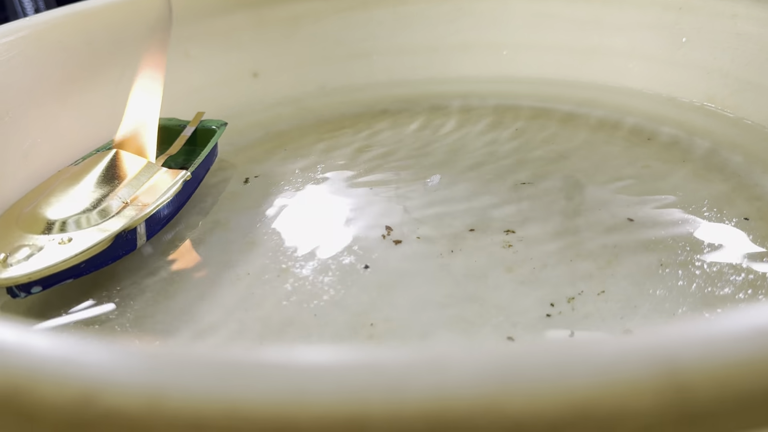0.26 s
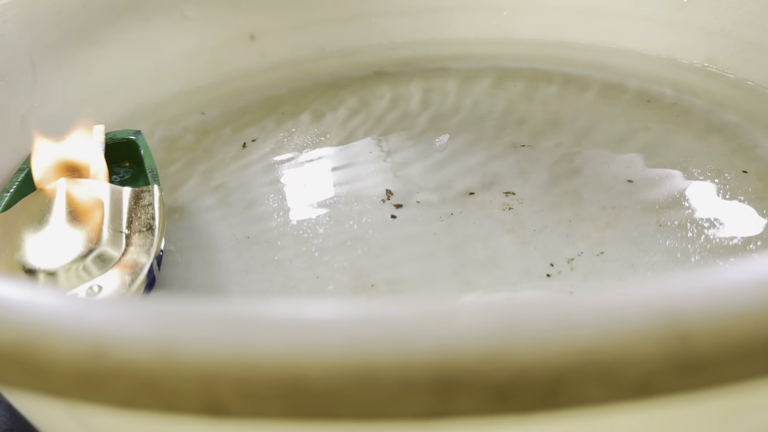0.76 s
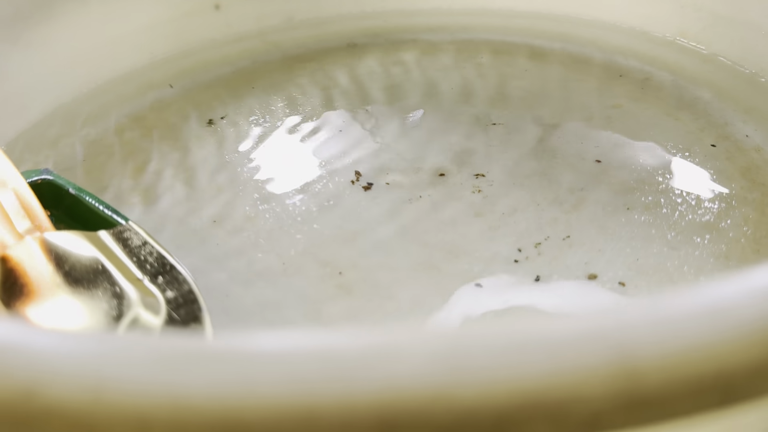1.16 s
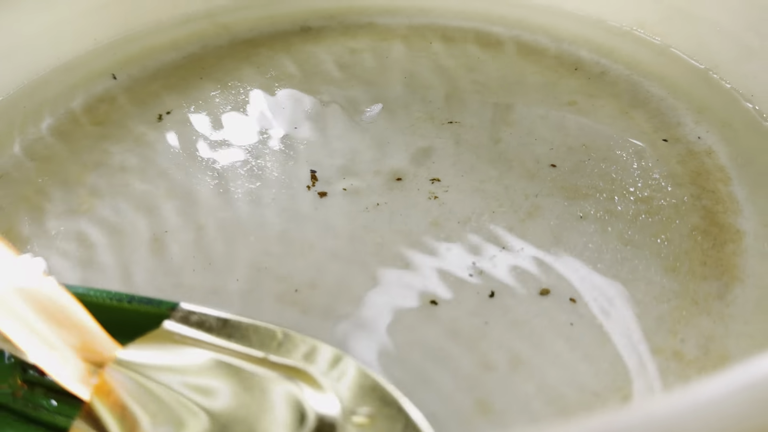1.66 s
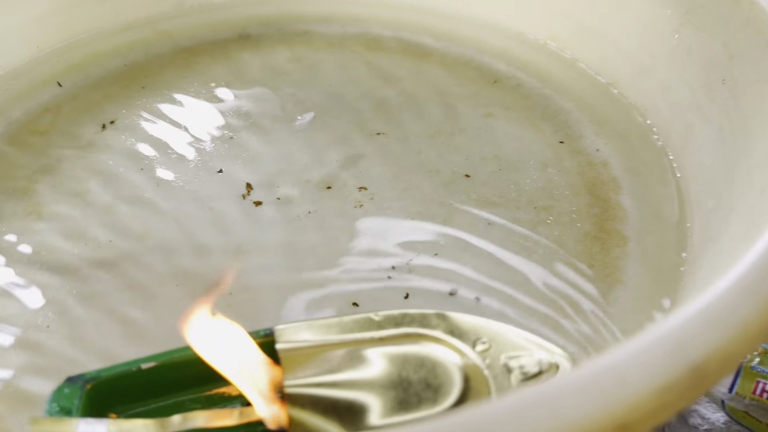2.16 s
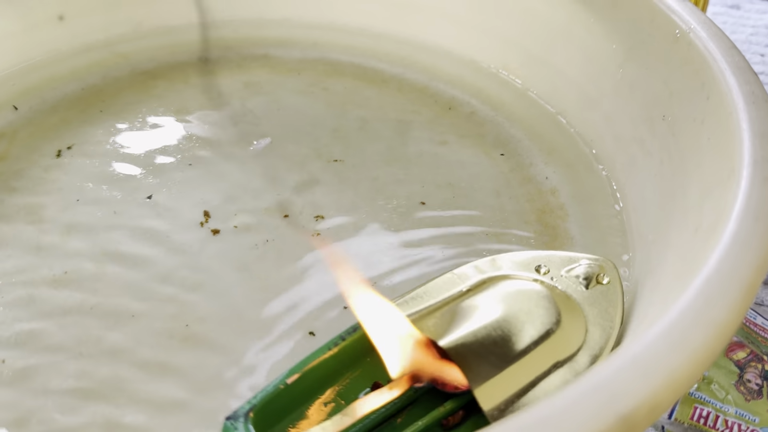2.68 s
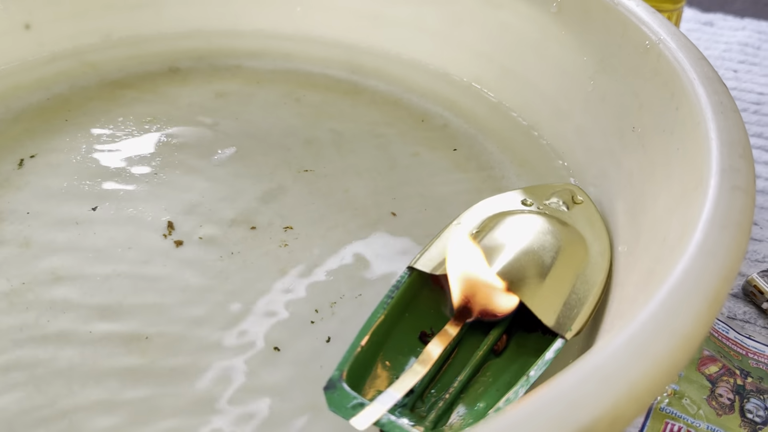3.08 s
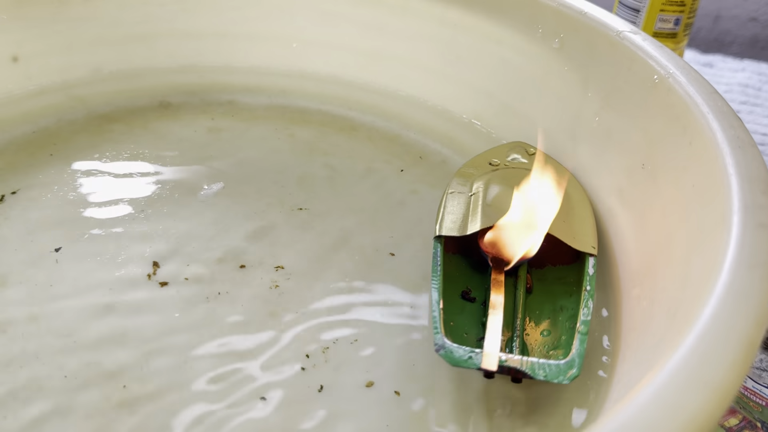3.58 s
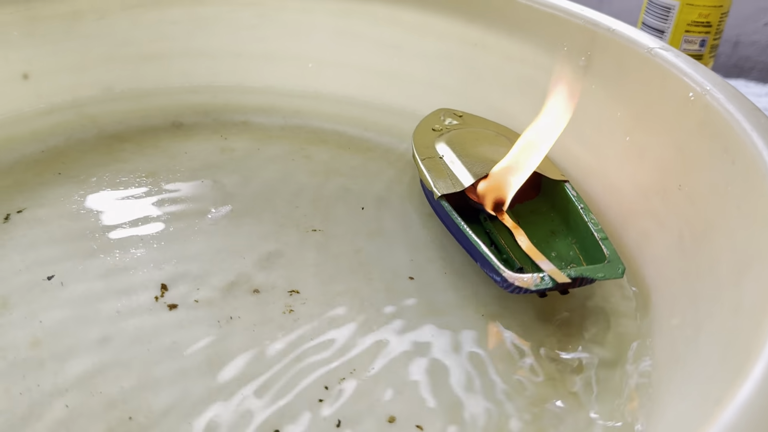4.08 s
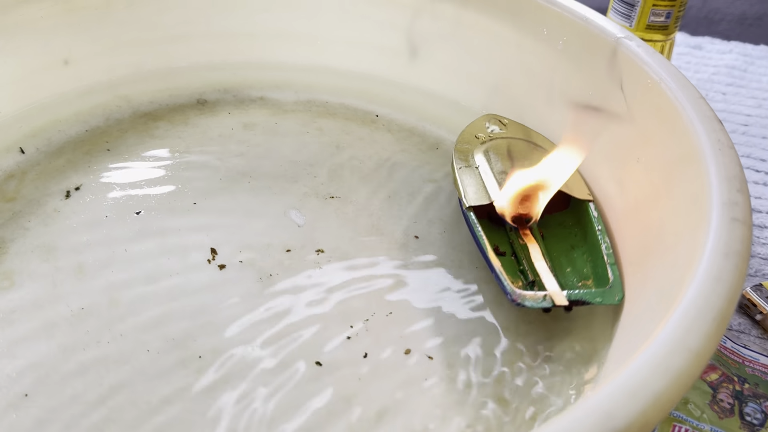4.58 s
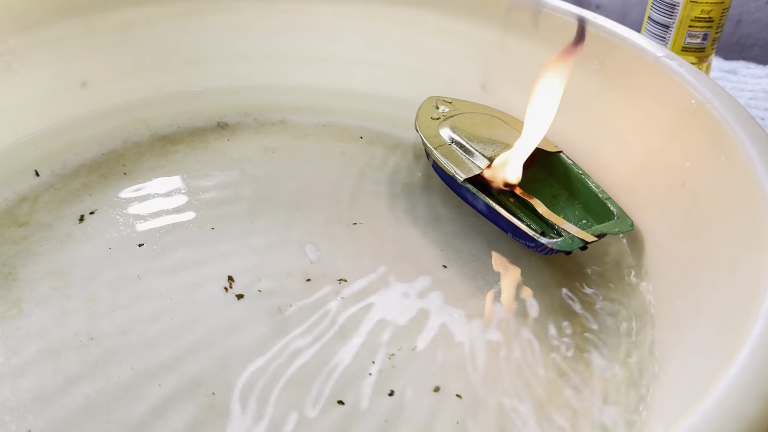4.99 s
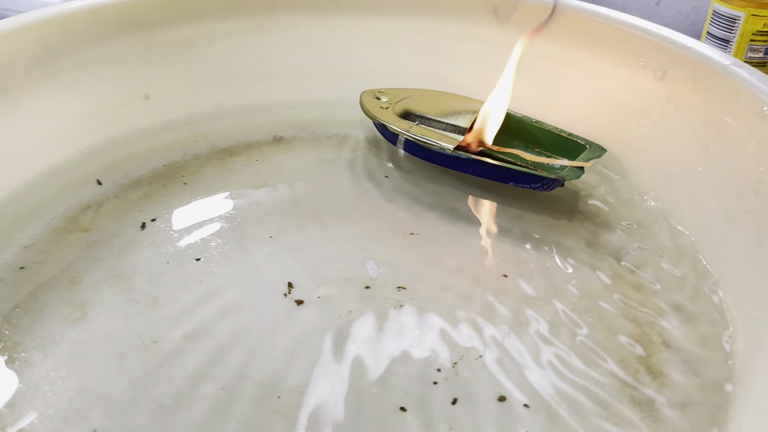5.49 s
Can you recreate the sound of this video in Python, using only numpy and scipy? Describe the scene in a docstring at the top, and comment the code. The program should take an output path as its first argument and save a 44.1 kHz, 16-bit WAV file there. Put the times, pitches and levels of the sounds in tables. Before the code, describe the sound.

A tiny tin toy steam boat putters rapidly in a water basin, its metallic popping growing louder, with one brief hiccup near the end.

```python
"""Tin steam boat in a basin

A candle-heated tin toy boat circles a plastic basin of water. Its boiler diaphragm snaps out and back in
about eighteen times a second: each snap is a damped sine pop that rings split hull modes, sets off noise
rattle and echoes round the basin wall. Near 4.35 s two inward snaps follow closely. A pair of microphone
ports hangs just over the rim; soft knocks, a room tail and faint rumble lie behind."""
import sys
import numpy as np
from scipy import signal
from scipy.fft import rfft, irfft
from scipy.io import wavfile

SR = 44100
rng = np.random.default_rng(int(sys.argv[2]) if len(sys.argv) > 2 else 0)


def bounce(signal):
    """Save signal as a 16-bit WAV file at the path given by the first command-line argument."""
    frames = np.transpose(np.atleast_2d(signal))
    limited = np.clip(frames, -1, 1)
    pcm = np.round(limited * 32767).astype(np.int16)
    wavfile.write(sys.argv[1], SR, pcm)


N = 253134
LENGTH = 4096  # samples computed for each snap or knock
AGE_S = np.arange(LENGTH) / SR

# Diaphragm snaps outward. Each row: time in seconds, level in dB.
OUT_SNAPS = [(0.0366, -24), (0.0919, -21.5), (0.147, -21), (0.2017, -21), (0.2565, -23.5), (0.3127, -23.5),
             (0.3679, -22), (0.4228, -22), (0.4778, -22), (0.533, -21.5), (0.5883, -22.5), (0.6444, -19.5),
             (0.6996, -23), (0.7546, -20), (0.8101, -20.5), (0.8653, -20.5), (0.9213, -19), (0.9776, -19),
             (1.0325, -19), (1.088, -16.5), (1.1428, -17.5), (1.1986, -18.5), (1.2543, -18),
             (1.3096, -16.5), (1.3648, -18), (1.4202, -17), (1.4761, -14.5), (1.5317, -15), (1.5869, -15.5),
             (1.6419, -15), (1.6976, -16), (1.7529, -16), (1.8074, -16), (1.862, -17), (1.9174, -16),
             (1.9731, -16), (2.0293, -16), (2.0851, -18), (2.1404, -16), (2.1966, -14.5), (2.2527, -15.5),
             (2.3083, -15.5), (2.3637, -17.5), (2.4193, -16), (2.4757, -15.5), (2.532, -17),
             (2.5879, -17.5), (2.6429, -18), (2.6985, -17), (2.7538, -16), (2.8095, -13.5), (2.8659, -14.5),
             (2.9223, -14), (2.9786, -16.5), (3.0341, -15.5), (3.0894, -15), (3.1457, -17), (3.2016, -16.5),
             (3.2571, -15.5), (3.3137, -14.5), (3.3701, -17), (3.4256, -16), (3.4811, -14.5), (3.5366, -15),
             (3.5915, -15), (3.6473, -15.5), (3.7031, -14.5), (3.7588, -15.5), (3.814, -17), (3.8695, -14),
             (3.9251, -13.5), (3.9808, -14), (4.0356, -14), (4.0917, -13), (4.1476, -13.5), (4.2027, -12.5),
             (4.2581, -13), (4.3146, -11.5), (4.3996, -13.5), (4.4534, -16), (4.5077, -14.5),
             (4.5617, -14.5), (4.6157, -14), (4.6696, -13), (4.7241, -15.5), (4.7785, -13), (4.833, -13),
             (4.8877, -13), (4.9416, -12.5), (4.996, -13), (5.0518, -12.5), (5.1071, -12), (5.1618, -10.5),
             (5.2152, -11.5), (5.2692, -11.5), (5.3243, -11.5), (5.3786, -11.5), (5.4321, -12.5),
             (5.4859, -13.5), (5.5412, -13), (5.5963, -13), (5.6495, -13.5), (5.7033, -13.5)]
# Diaphragm snaps back inward. Each row: time in seconds, level in dB.
IN_SNAPS = [(0.0051, -22), (0.0607, -20.5), (0.1156, -20.5), (0.171, -21.5), (0.2256, -21.5), (0.2805, -22),
            (0.3365, -22.5), (0.3919, -21), (0.4462, -23.5), (0.5016, -23.5), (0.5572, -22.5),
            (0.6125, -24), (0.6693, -23.5), (0.7224, -23), (0.7791, -24), (0.8337, -24.5), (0.889, -22),
            (0.9465, -21.5), (1.0011, -20.5), (1.0561, -21), (1.1117, -21), (1.1663, -22), (1.2233, -19),
            (1.2781, -19.5), (1.3332, -19), (1.3882, -19.5), (1.4439, -18.5), (1.5004, -18.5),
            (1.5565, -18), (1.6107, -18), (1.6655, -18.5), (1.7213, -16.5), (1.7762, -15.5),
            (1.8315, -16.5), (1.8857, -16.5), (1.9424, -16), (1.9969, -17.5), (2.0542, -16.5),
            (2.1091, -18), (2.164, -18.5), (2.2208, -18.5), (2.2761, -16.5), (2.3317, -17), (2.387, -19.5),
            (2.4429, -20), (2.4995, -18.5), (2.5554, -18), (2.6115, -18.5), (2.6664, -17), (2.722, -18),
            (2.7767, -17.5), (2.8339, -16.5), (2.8901, -18.5), (2.9461, -16), (3.0027, -16.5),
            (3.0572, -18), (3.1129, -17), (3.1695, -18), (3.2247, -18), (3.2805, -18), (3.3387, -18),
            (3.3946, -17), (3.4493, -17), (3.5048, -16.5), (3.5598, -16.5), (3.6149, -17), (3.6715, -16),
            (3.7268, -16), (3.782, -16.5), (3.8376, -16.5), (3.8939, -16), (3.9489, -16), (4.0049, -16),
            (4.06, -16), (4.1157, -15), (4.1713, -16.5), (4.2264, -16.5), (4.2826, -16), (4.3387, -19),
            (4.3689, -19), (4.4227, -20.5), (4.4777, -16.5), (4.5313, -18.5), (4.5851, -17), (4.6397, -18),
            (4.694, -18), (4.7487, -18), (4.8029, -17.5), (4.8578, -18), (4.9125, -16.5), (4.9667, -17.5),
            (5.0219, -17.5), (5.0777, -17.5), (5.1318, -17.5), (5.1858, -17), (5.2386, -15.0),
            (5.2938, -16), (5.3478, -17.5), (5.4016, -16.5), (5.4557, -18), (5.5095, -17), (5.5657, -18.5),
            (5.6198, -19), (5.6729, -18), (5.7268, -18)]
# The boat turns. Each row: time in seconds, left over right in dB, outward pop in Hz, inward pop in Hz,
# first ring in Hz, second ring in Hz, echo in relative dB, upper hull and echo in dB,
# band near 1050 Hz in relative dB, band near 2750 Hz in relative dB.
COURSE = [(0.0, 5.8, 1520, 1380, 1780, 1484, 5.5, -6.5, -4, 1.5),
          (0.45, 3.3, 1670, 1344, 1820, 1416, 6, -4, -4, 3),
          (0.82, 5.5, 1770, 1340, 1811, 1465, 6.5, -2.5, 3, 1),
          (1.15, 3.6, 1740, 1280, 1855, 1487, 2.5, -2.5, 2.5, 4.5),
          (1.3, 4.5, 1660, 1290, 1850, 1280, 3, -2.5, -1.5, 4.5),
          (1.6, 4.8, 1684, 1370, 1850, 1255, 2, -5.5, 0.5, 2.5),
          (2.05, 5.1, 1836, 1380, 1880, 1278, 2, -4, 3.5, 0),
          (2.6, 2.6, 1744, 1245, 1737, 1321, 3, -2.5, -3.5, 3.5),
          (3.1, 3.4, 1635, 1213, 1765, 1337, 1, -5, -2.5, 0.5),
          (3.5, 5.2, 1830, 1270, 1827, 1173, -1, -0.6, -2.5, -2),
          (4.1, 6.4, 1570, 1317, 1710, 1230, -1.5, -3, -6.5, -1.5),
          (4.5, 4.3, 1836, 1273, 1675, 1212, 1.5, -5, -3, -2.5),
          (4.8, 3.6, 1640, 1267, 1671, 1206, -2, -2.5, -0.5, -9.5),
          (5.33, 2.8, 1800, 1330, 1692, 1230, -4, 0.5, -0.5, -4.5),
          (5.74, 1.1, 1680, 1265, 1820, 1180, 3, -4, 1, 1)]
# Hull modes. Each row: pitch in Hz, outward strength in relative dB, inward strength in relative dB,
# longest t60 in seconds, rise in seconds.
HULL = [(1139, -24, -14, 0.027, 0.0014), (2151, -21, -8, 0.034, 0.001), (2493, -15.5, -10, 0.024, 0.0019),
        (381, -20.5, -16.5, 0.012, 0.0014)]
# Beaming modes, columns as HULL; COURSE sets the sounding pitch of the first two.
RINGS = [(1784, -20.5, -22, 0.054, 0.0026), (1270, -13, -12, 0.035, 0.00076),
         (480.6, -13, -15, 0.011, 0.0013), (3401, -38, -7.5, 0.018, 0.004), (4297, -15, -26, 0.014, 0.0009),
         (6216, -7.5, -13, 0.018, 0.0022), (801, -25.5, -31.5, 0.067, 0.0021),
         (2125, -21.5, -23, 0.072, 0.0029), (2635, -14, -28, 0.024, 0.004), (3713, -45, -3.5, 0.02, 0.0017),
         (1576, -10.5, -9.5, 0.016, 0.0027), (2268, -38, 1, 0.013, 0.0022)]
# Lobes of each ring that sweep past the ports. Each row: quiet level in relative dB, then a list of lobes:
# centre in seconds, half width (to 1/e) in seconds, strength in relative dB.
LOBES = [(-45, [(.68, 0.3, 14), (3.05, 0.47, 8), (4.1, 0.11, -5.5), (4.9, 0.35, 10.5)]),
         (-31, [(.6, 0.73, 8), (2.55, 0.5, 3.5), (3.9, 0.61, -3), (5.3, 1, -6)]), (-1.5, [(0.1, .9, 6.5)]),
         (-5, [(0.2, 0.65, 9.5), (2.05, 0.45, 3), (3.0, 0.45, 6), (4.05, 0.32, 10), (5.6, 0.39, -4)]),
         (-7, [(.6, 0.93, 1), (3.9, 0.59, 3), (5.5, 0.61, -1.5)]), (-44, [(1.25, 0.16, -3.5),
         (2.75, 0.2, 0.5), (3.15, 0.23, 7.5)]), (-9.5, [(.6, .8, 7)]), (-37, [(.55, 0.22, 5),
         (2.0, 0.67, 2)]), (-5, [(2.2, 0.86, 7.5)]), (-26, [(1.4, 0.54, 0.5)]), (0, [(.1, 0.16, -6),
         (1.6, 0.49, 8.5), (4.15, 0.21, 11), (5.1, 0.36, 12), (5.6, 0.38, 15)]), (-9, [(1.9, 0.35, -4),
         (3.8, 0.15, 0.5), (4.7, 0.34, 5), (5.3, 0.25, -3)])]
# Bearing of the boat. Each row: time in seconds, lead of the left port in ms.
BEARING = [(0, 0.43), (1.6, .44), (2.1, 0.33), (2.45, 0.18), (3.1, 0.11), (3.7, 0.035), (5.74, 0.014)]
# Near wall reflection, a gliding comb. Each row: time in seconds, left delay in ms, right delay in ms,
# left level in dB, right level in dB (both relative to the straight sound).
WALL = [(0, 1.37, 1.22, -17, -8.5), (.45, 2.27, 0.98, -21, -3.5), (1.0, 2.39, 1.05, -10, -29),
        (1.55, 2.7, 1.5, -11, -21), (2.1, 2.61, 1.33, 0.5, -7.5), (2.6, 2.5, 2.06, -10, -25),
        (3.1, 2.31, 1.77, -6.5, -9), (3.9, 1.85, 1.63, -18, -11), (4.34, 1.55, 1.6, -18, -8),
        (4.37, 1.64, 1.88, -10, -5), (4.85, 1.64, 1.72, -10, -10), (5.74, 1.46, 1.63, -13, -10)]
# Basin echo spectra of outward and inward snaps. Each row: frequency in Hz, gain in relative dB.
ECHO_OUT = [(400, -48), (560, -1.5), (900, -16.5), (1200, 0.5), (1700, 4.5), (2300, -2), (3500, -6.5),
            (5000, -9), (7000, -23.5), (9000, -36.5)]
ECHO_IN = [(400, -20), (560, -18.5), (900, -11), (1200, -1), (1700, -9), (2300, -25.5), (3500, -6.5),
           (5000, -20), (7000, -35), (9000, -42)]
# Rattle spectrum. Each row: frequency in Hz, gain in relative dB.
RATTLE_SPECTRUM = [(2500, -5.5), (5000, 4), (6300, 5.5), (7200, -5), (8400, 2), (11000, 0), (14600, -1.5),
                   (15800, 16), (16400, -2)]
# Rattle strength. Each row: time in seconds, level in relative dB.
RATTLE_DB = [(0, -33.5), (.31, -35), (.98, -35.5), (1.3, -33), (1.97, -33.5), (2.3, -32.5), (2.64, -32.5),
             (2.98, -30.5), (3.3, -28), (3.65, -28), (3.98, -29.5), (4.33, -30), (4.67, -30.5), (5.0, -34),
             (5.32, -30.5), (5.74, -30.5)]
# Radiation of the small hull over water. Each row: frequency in Hz, gain in dB.
BOAT_SPECTRUM = [(120, -55), (250, -1.5), (560, -3.5), (720, -7.5), (860, -1.5), (1000, 1.0),
                 (5400, 0), (5700, -0.5), (6000, 3.5)]
# Soft low knocks. Each row: start in seconds, level before the envelope in dB, pitch in Hz.
KNOCKS = [(0.209, -48, 246), (.438, -39, 150), (.44, -53, 250), (0.638, -42.5, 162), (0.868, -46, 158),
          (0.884, -42, 258), (1.093, -40.5, 252), (1.21, -42, 250), (1.57, -45, 270), (1.886, -37, 96)]
# Room rumble spectrum. Each row: frequency in Hz, gain in relative dB.
RUMBLE_SPECTRUM = [(25, -47), (40, -7), (60, -1), (90, -1.5), (125, -13), (160, -4.5), (250, -19.5),
                   (500, -9), (1000, -22.5)]
# Swell of the deepest rumble. Each row: time in seconds, gain in dB.
RUMBLE_DB = [(0, -50), (2.7, -51), (3.2, -48), (4.1, -52), (4.6, -48), (5.74, -45)]

SLIP_MAX_S, SLIP_DB = 0.0036, -15.5  # latest after-slip, mean slip gain
TWIN_SHARE = 0.2  # weight of a mode's split partner
FRESH = 0.12  # weight of the echo noise that is new at each snap
TOP_LAG_S = 16 / SR  # fixed stereo delay of the rattle's top, left channel
RATTLE_SCATTER_DB, IN_RATTLE_DB = 2, -1.45
TICK_LEAD_S = 0.00382
ROOM_T60_S, ROOM_DB = 0.24, -16
RUMBLE_STEADY_DB = -51
CUTOFF_HZ = 16500


def snaps(table, column, echo_spectrum, pop_db, pop_t60_s, pop_rise_s, rattle_offset_db, ticking):
    """Diaphragm buckling one way (column 1 out, 2 in): pop, modes, echo and rattle on two channels."""
    s, level_db = np.transpose(table)
    (pan_db, out_hz, in_hz, first_hz, second_hz,
     echo_db, upper_db, low_db, high_db) = follow(COURSE, s)
    lead_s = follow(BEARING, s)[0] / 1000
    level = from_db(level_db)[:, None]

    pop = from_db(pop_db) * ring((out_hz, in_hz)[column - 1], pop_t60_s, pop_rise_s)
    direct = pop + struck_modes(s, column, first_hz, second_hz, upper_db)
    both = arrive(direct, s, lead_s)
    both += from_db(echo_db - 8) * basin(s, echo_spectrum, upper_db)
    # the hull hides or shows these bands as it turns: centre in Hz, width in octaves, gain in dB
    both = shade(both, [(1100, 0.1, low_db), (2570, 0.31, high_db)])
    # the port on the boat's side is louder above the bass only
    middle = pass_filter(both, 650, "high")
    port_gain = from_db(np.stack([pan_db, -pan_db]) / 2)
    both = level * (both + (port_gain - 1) * middle)
    both += rattle(s, rattle_offset_db)

    starts = np.round(s * SR).astype(int)
    out = np.zeros((2, N + LENGTH))
    for k, start in enumerate(starts):
        out[:, start:start + LENGTH] += both[:, k]
    if ticking:
        early_starts = np.maximum(starts - round(TICK_LEAD_S * SR), 0)
        for start, tick in zip(early_starts, ticks(level, lead_s)):
            out[:, start:start + LENGTH] += tick
    return out[:, :N]


def struck_modes(s, column, first_hz, second_hz, upper_db):
    """Hull modes struck anew by each snap: damped sines, each with a beating twin."""
    modes = HULL + RINGS
    pitches_hz = [mode[0] for mode in HULL] + [first_hz, second_hz] + [mode[0] for mode in RINGS[2:]]
    # hull strengths creep with the heading
    creep_db = 2 * wander(s, 0.548, count=len(HULL)).T[:, :, None]
    strengths_db = [creep + upper_db * (mode[0] > 2000) for creep, mode in zip(creep_db, HULL)]
    strengths_db += [beam_db(s, *beam) for beam in LOBES]
    scatter = rng.standard_normal((len(s), len(modes), 3))
    total = 0
    for k, (mode, hz, strength_db) in enumerate(zip(modes, pitches_hz, strengths_db)):
        gain = from_db(mode[column] + 8 + strength_db + 1.5 * scatter[:, k, :1])
        t60_s = min(mode[3], (780 / mode[0]) ** 2)  # wet tin damps the high modes fastest
        # thin tin splits each mode into an uneven pair
        twin_hz = hz * (1.03 + 0.008 * scatter[:, k, 1:2])
        twin = ring(twin_hz, t60_s, mode[4], phase=0.6 * scatter[:, k, 2:])
        total = total + gain * (ring(hz, t60_s, mode[4]) + TWIN_SHARE * twin)
    return total


def beam_db(s, quiet_db, lobes):
    """Strength of a directional ring: Gaussian lobes in time over a quiet level."""
    gain = from_db(quiet_db)
    for centre_s, width_s, db in lobes:
        gain = gain + from_db(db) * np.exp(-((s - centre_s) / width_s) ** 2)
    return 20 * np.log10(gain)[:, None]


def arrive(direct, s, lead_s):
    """Tin lets go in stages; delayed copies reach both ports, straight and off the near wall."""
    turn = -2j * np.pi * np.fft.rfftfreq(LENGTH, 1 / SR)  # exp(turn * s) delays by s
    left_ms, right_ms, left_db, right_db = follow(WALL, s)
    slips = rng.random((len(s), 2, 2))
    staged = 1
    for k in range(2):
        slip_gain = from_db(SLIP_DB) * 2 * slips[:, k, :1]
        staged = staged + slip_gain * np.exp(turn * SLIP_MAX_S * slips[:, k, 1:])
    left = 1 + from_db(left_db) * np.exp(turn * left_ms / 1000)
    right = 1 + from_db(right_db) * np.exp(turn * right_ms / 1000)
    right = right * np.exp(turn * lead_s)
    return irfft(rfft(direct) * staged * np.stack([left, right]), LENGTH)


def basin(s, spectrum, upper_db):
    """Wall echo: sparse reflections, alike from snap to snap, remixed slowly as the boat moves."""
    weights = wander(s, 0.532, count=8) / np.sqrt(8)
    paths = rng.standard_normal((2, 8, LENGTH)) * (rng.random((2, 8, LENGTH)) < 0.06)
    pattern = np.stack([weights @ paths[port] / np.std(paths) for port in range(2)])
    pattern += FRESH * rng.standard_normal(pattern.shape)
    pattern = rms_one(colour(pattern, spectrum))
    # long waves reach both ports alike
    pattern[1] += colour(pattern[0] - pattern[1], [(400, 0), (1000, -30)])
    upper = pass_filter(pattern, [2300, 6000], "band")
    return (pattern + (from_db(upper_db) - 1) * upper) * swell(0.001, 0.065)


def rattle(s, offset_db):
    """Loose tin chatters: lumpy bright noise after each snap, brighter when louder."""
    rattle_db = np.interp(s, *np.transpose(RATTLE_DB)) + offset_db
    rattle_db += RATTLE_SCATTER_DB * rng.standard_normal(len(s))
    lumps = from_db(2.47 * rng.standard_normal((len(s), LENGTH // 32))).repeat(32, axis=1)
    right, other = lumps * rng.standard_normal((2, *lumps.shape))
    # left channel: top delayed, middle shared, lower part its own
    left = colour(right, [(7900, -40), (8300, 0)], TOP_LAG_S)
    left += colour(right, [(6400, -30), (7000, 0), (8100, 0), (8500, -40)])
    left += colour(other, [(6700, 0), (7300, -11)])
    chatter = rms_one(colour(np.stack([left, right]), RATTLE_SPECTRUM))
    top = pass_filter(chatter, 10500, "high")
    chatter += (from_db(1.3 * (rattle_db + 30.5))[:, None] - 1) * top
    envelope = swell(0.0018, 0.038) + 0.017 * swell(0.0031, 0.036)
    return chatter * from_db(rattle_db + 8)[:, None] * envelope


def ticks(level, lead_s):
    """Early give of the tin: short 1400 Hz rings, shadowed while the boat lies to the left."""
    scatter_db = rng.uniform(-5, 5, level.shape)
    shadow_db = -15e3 * lead_s  # 15 dB per ms of lead
    return level * from_db(shadow_db + scatter_db) * ring(1400, 0.007, 0.001)


def knocks():
    """Dull, slow bumps: damped low sines, the same at both ports."""
    out = np.zeros(N)
    for s, level_db, hz in KNOCKS:
        start = round(s * SR)
        out[start:start + LENGTH] += from_db(level_db) * ring(hz, 0.12, 0.0042)
    return out


def room(x):
    """Diffuse room tail: convolution with decaying band-limited noise, own at each port."""
    age_s = np.arange(SR // 2) / SR
    decay = from_db(-60 * age_s / ROOM_T60_S) * (age_s > 0.006)
    tail = pass_filter(rng.standard_normal((2, len(age_s))) * decay, [700, 5000], "band")
    tail /= np.sqrt(np.sum(tail ** 2) / 2)
    return from_db(ROOM_DB) * signal.fftconvolve(x, tail, axes=1)[:, :N]


def rumble():
    """Low room noise, nearly the same at both ports; only its deepest part swells."""
    s = np.arange(N) / SR
    mid, side = colour(rng.standard_normal((2, N)), RUMBLE_SPECTRUM)
    side = colour(side, [(80, -5), (130, 15), (200, 8)])  # less alike higher up
    noise = rms_one(mid + 0.11 * side * [[1], [-1]])
    deep = colour(noise, [(100, 0), (130, -30)])
    deep_gain = from_db(np.interp(s, *np.transpose(RUMBLE_DB)))
    return deep_gain * deep + from_db(RUMBLE_STEADY_DB) * (noise - deep)


def from_db(db):
    """Decibels to gain."""
    return 10 ** (np.asarray(db) / 20)


def rms_one(x):
    """Scale to unit rms."""
    return x / np.sqrt(np.mean(x ** 2) + 1e-20)


def follow(table, s):
    """Table columns interpolated at times s, each as a column vector."""
    at_s, *columns = np.transpose(table)
    return [np.interp(s, at_s, column)[:, None] for column in columns]


def swell(rise_s, t60_s):
    """Envelope that builds up, then dies away."""
    return (1 - np.exp(-AGE_S / rise_s)) ** 2 * from_db(-60 * AGE_S / t60_s)


def ring(hz, t60_s, rise_s, phase=0):
    """Damped sine, phase in radians."""
    return np.sin(2 * np.pi * hz * AGE_S + phase) * swell(rise_s, t60_s)


def wander(s, top_hz, count):
    """Slow random values of spread 1 at times s, one column each: sums of four cosines."""
    hz = top_hz * rng.uniform(0.28, 1, (count, 4))
    phase = 2 * np.pi * rng.random((count, 4))
    return np.cos(2 * np.pi * s[:, None, None] * hz + phase).sum(-1) / np.sqrt(2)


def pass_filter(x, hz, kind):
    """Second-order Butterworth design along the last axis."""
    return signal.sosfilt(signal.butter(2, hz, kind, fs=SR, output="sos"), x)


def colour(x, spectrum, lag_s=0):
    """Shape the last axis by a (Hz, dB) spectrum, linear in log frequency, and delay it."""
    hz = np.maximum(np.fft.rfftfreq(x.shape[-1], 1 / SR), 1)
    at_hz, gain_db = np.transpose(spectrum)
    gain = from_db(np.interp(np.log(hz), np.log(at_hz), gain_db))
    return irfft(rfft(x) * gain * np.exp(-2j * np.pi * hz * lag_s), x.shape[-1])


def shade(x, bands):
    """Raise or lower bands (centre Hz, width in octaves, dB for each snap) of the last axis."""
    hz = np.maximum(np.fft.rfftfreq(x.shape[-1], 1 / SR), 1)
    gain_db = sum(db * np.exp(-(np.log2(hz / centre_hz) / width) ** 2) for centre_hz, width, db in bands)
    return irfft(rfft(x) * from_db(gain_db), x.shape[-1])


def scene():
    """Both strokes of the diaphragm over the room."""
    outward = snaps(OUT_SNAPS, 1, ECHO_OUT, pop_db=18.5, pop_t60_s=0.0065, pop_rise_s=0.00082,
                    rattle_offset_db=0, ticking=True)
    inward = snaps(IN_SNAPS, 2, ECHO_IN, pop_db=23, pop_t60_s=0.008, pop_rise_s=0.002,
                   rattle_offset_db=IN_RATTLE_DB, ticking=False)
    # a small hull radiates no bass; the water surface hollows out a band below the main rings
    boat = colour(outward + inward, BOAT_SPECTRUM)
    return boat + knocks() + room(boat) + rumble()


def record(dry):
    """Steep low-pass: 80 dB down from the cutoff up."""
    return signal.sosfilt(signal.cheby2(12, 80, CUTOFF_HZ, fs=SR, output="sos"), dry)


dry = scene()
out = record(dry)
bounce(out)
```